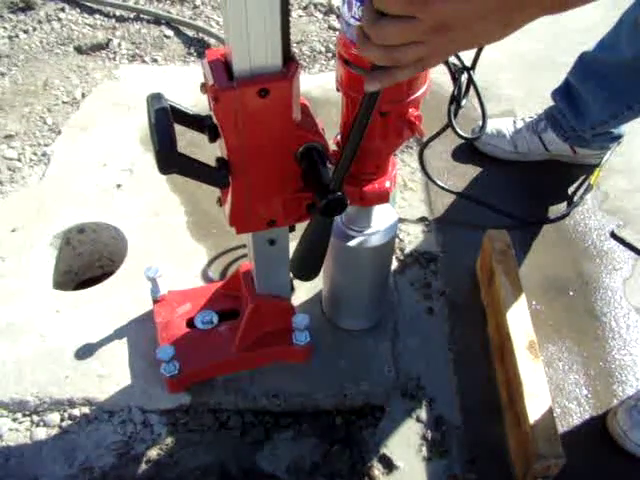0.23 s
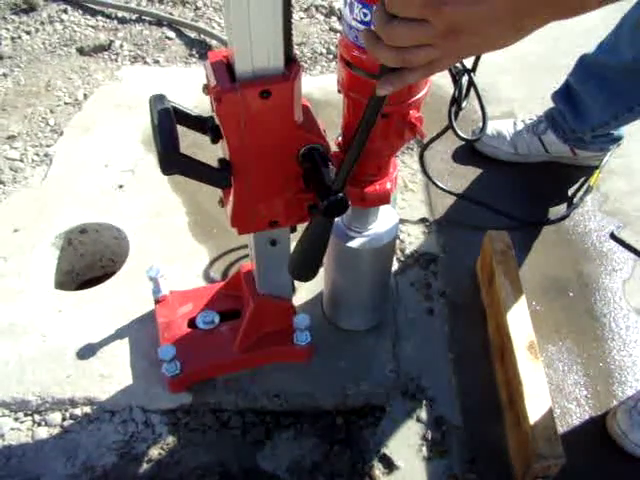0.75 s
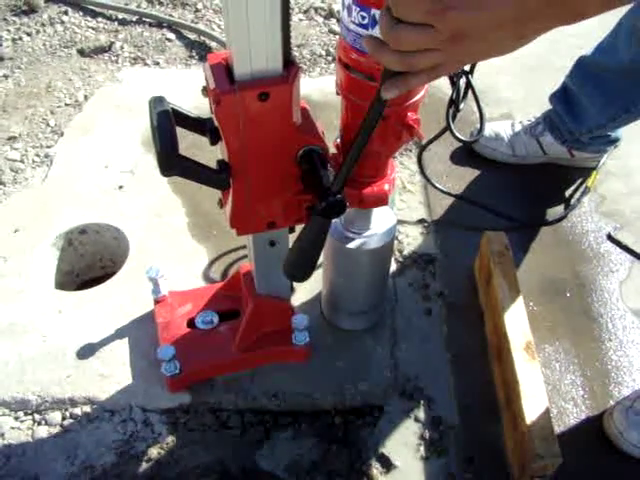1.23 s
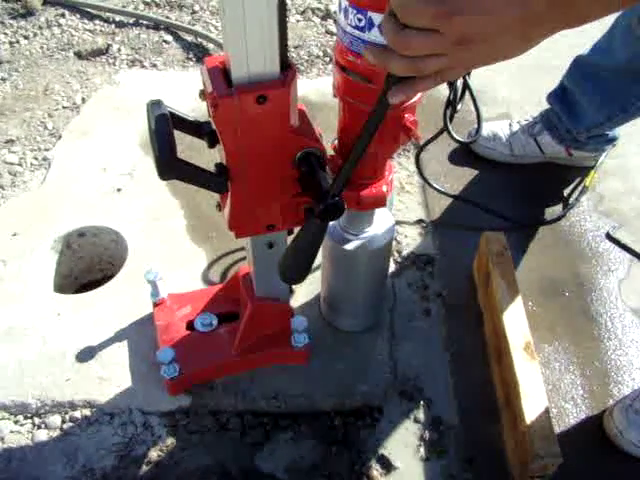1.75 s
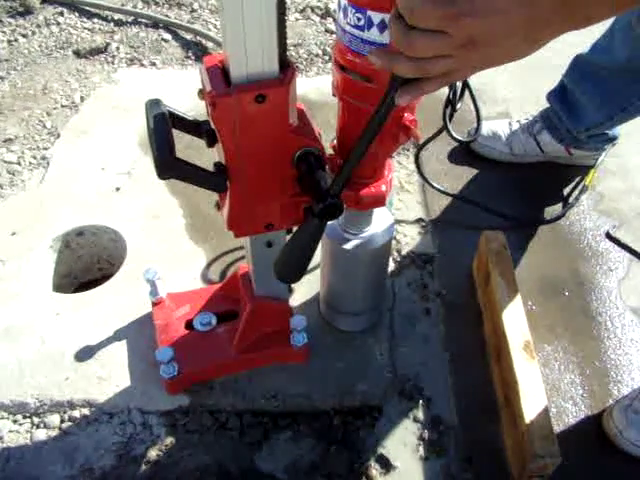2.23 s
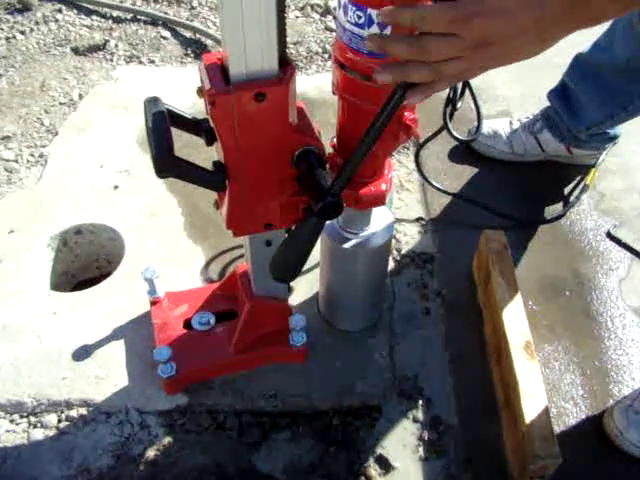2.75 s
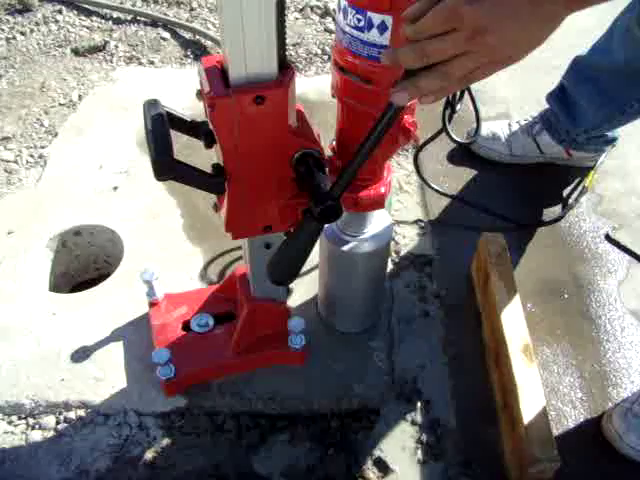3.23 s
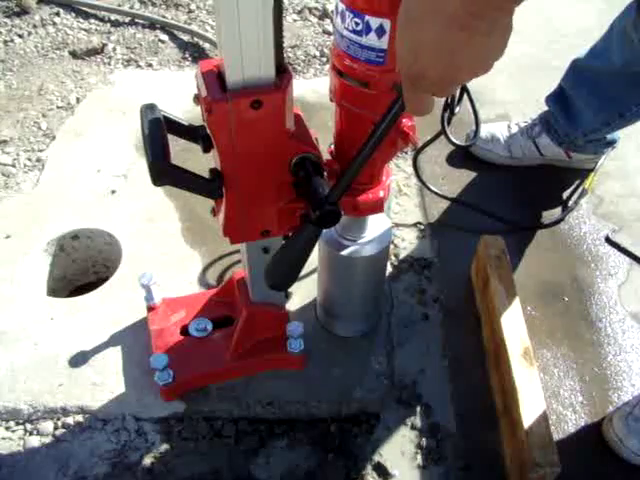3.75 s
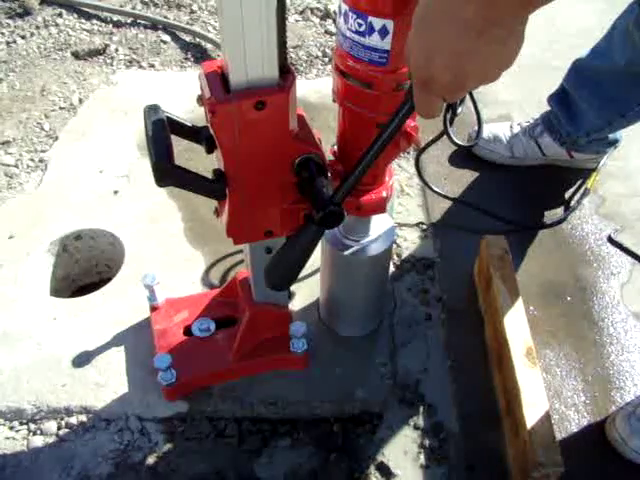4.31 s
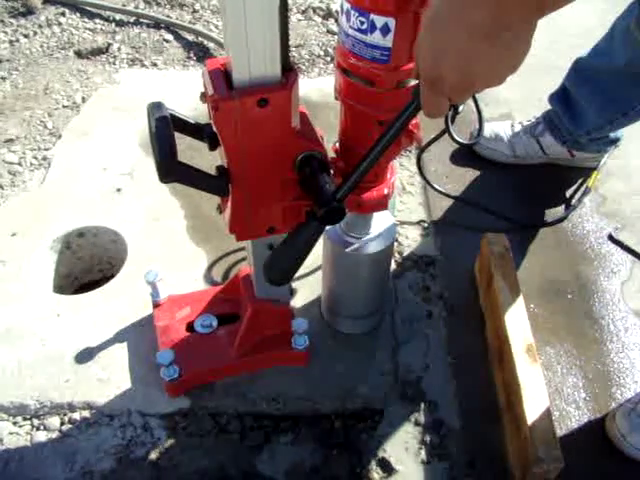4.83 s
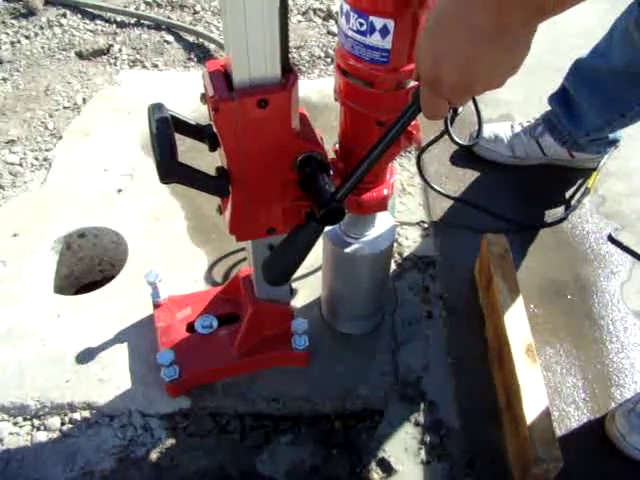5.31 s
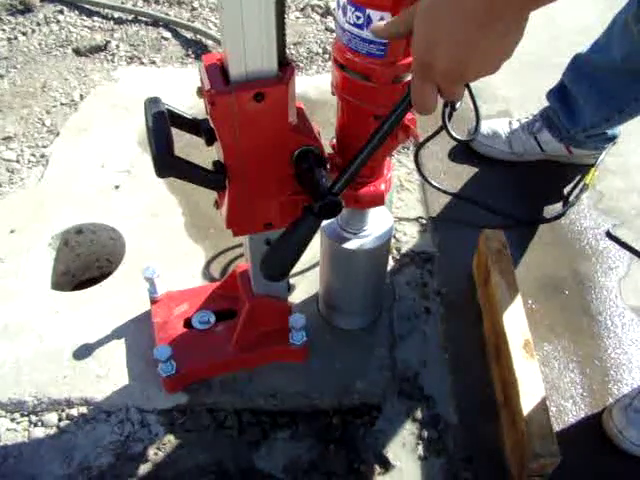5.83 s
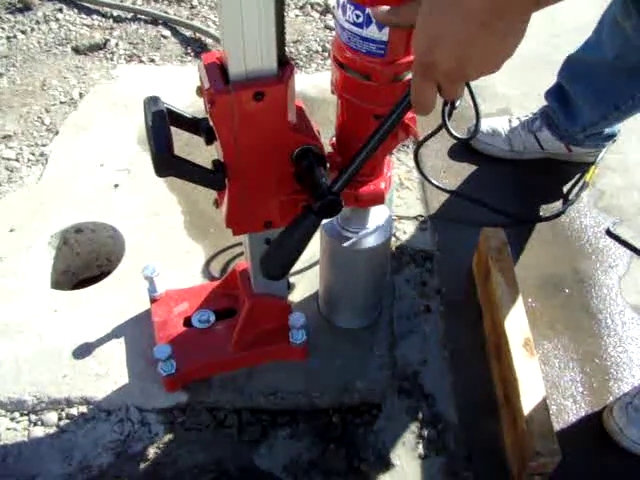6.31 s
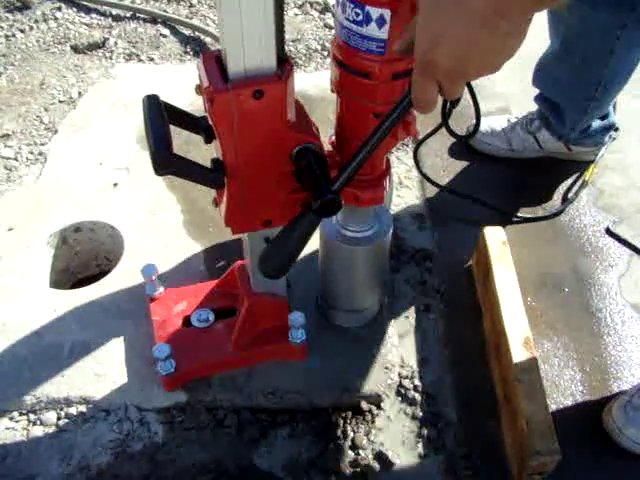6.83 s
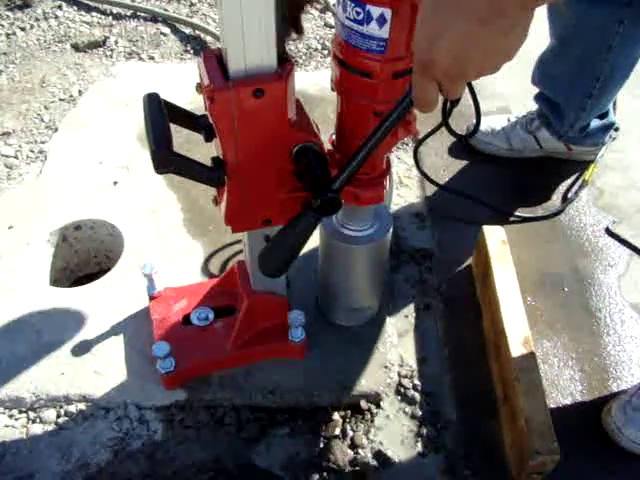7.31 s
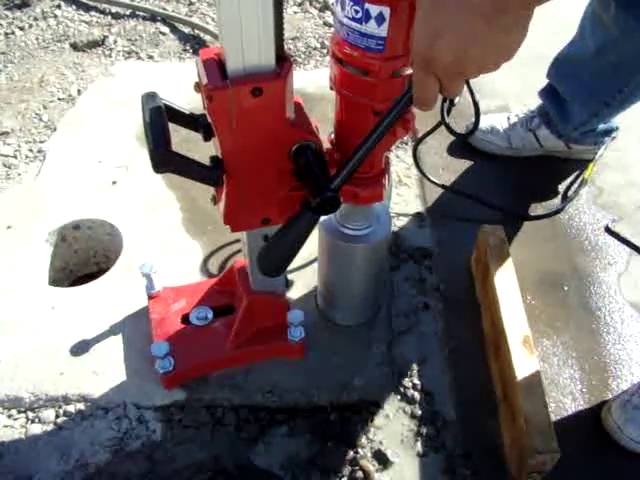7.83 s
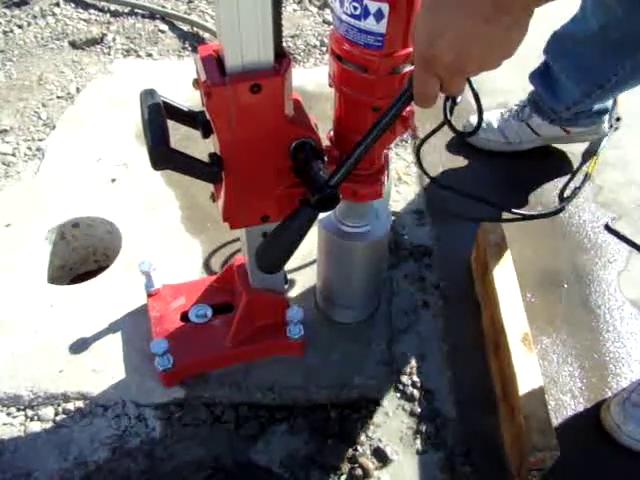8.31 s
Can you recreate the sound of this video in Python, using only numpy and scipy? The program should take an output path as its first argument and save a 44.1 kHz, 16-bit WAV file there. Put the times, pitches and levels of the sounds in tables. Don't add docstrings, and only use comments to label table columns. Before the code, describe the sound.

A geared drill motor runs continuously, first pressed hard with a firm buzzing whine and rough grinding roar. The whine wavers briefly, leaps higher as pressure is relieved, dips a little and climbs again. Then the smooth tone breaks into fast, irregular metallic knocking, with piercing steel chirps over rushing fan noise. Close, dry outdoor pickup on a small camera, mildly overdriven, weak in bass and cut off at the top.

```python
import sys
import numpy as np
from scipy import signal
from scipy.fft import rfft, irfft
from scipy.io import wavfile
from scipy.ndimage import uniform_filter1d

SR = 44100
rng = np.random.default_rng(int(sys.argv[2]) if len(sys.argv) > 2 else 0)


def put_to_file(sound):
    columns = np.atleast_2d(sound).T
    safe = np.clip(columns, -1, 1)
    whole_steps = np.round(safe * 32767)
    wavfile.write(sys.argv[1], SR, whole_steps.astype(np.int16))


def volts_from_db(level):
    exponent = np.asarray(level, float) / 20
    return 10 ** exponent


N = 377496
TIME = np.arange(N) / SR
SLACK_SPAN = (5.4, 6.65)


def walk(rate):
    hold = int(SR / rate)
    held = np.repeat(rng.standard_normal(N // hold + 1), hold)
    return 1.33 * uniform_filter1d(uniform_filter1d(held, hold), hold)[:N]


def spinner(turns):
    return np.exp(2j * np.pi * (turns + rng.random()))


def swells(s, db, width_s, sharp=2.2):
    out = np.zeros(N)
    for centre, gain, width in zip(s, volts_from_db(db), width_s):
        first = max(int((centre - 1.5 * width) * SR), 0)
        near = slice(first, int((centre + 1.5 * width) * SR))
        out[near] += gain * 2 ** -(abs(2 * (TIME[near] - centre) / width) ** sharp)
    return out


def motor_speed():
    # time in seconds, first mesh pitch in Hz.
    speed_curve = [(0, 2011), (1.5, 2023), (2.12, 2018), (2.38, 2029), (2.75, 2065), (3.13, 2023),
                   (3.87, 2346), (4.15, 2217), (4.5, 2238), (5.05, 2204), (5.3, 2235), (5.85, 2403),
                   (6.2, 2467), (6.65, 2511), (7.3, 2535), (8.14, 2557), (8.38, 2492), (8.56, 2496)]
    s, pitch = np.transpose(speed_curve)
    return uniform_filter1d(np.interp(TIME, s, pitch), SR // 7)


def by_load(mesh_hz, dbs):
    load_hz = (2030, 2240, 2500)
    return volts_from_db(np.interp(mesh_hz, load_hz, dbs))


def noise_spectrum(f):
    # frequency in Hz, level in dB per Hz.
    noise_colour = [(25, -34), (100, -33), (170, -31.5), (240, -23), (320, -25), (450, -17.5), (700, -10),
                    (1600, -6.5), (2300, -2.5), (3600, 0), (5500, -4), (7500, -5.5), (10000, -15)]
    # centre in Hz, width in Hz, boost in dB.
    housing_peaks = [(584, 190, 6.6), (992, 328, 10.7), (1367, 138, 8.1), (1948, 285, 9.6), (2590, 234, 7),
                     (3000, 390, 3.35), (3410, 190, 1.4), (4180, 480, 3.3), (4780, 320, 1.2),
                     (5440, 360, 2.5), (6940, 300, 2.5), (7860, 300, 3.4), (8840, 380, 3.1),
                     (9860, 1200, 6.24)]
    colour_hz, colour_db = np.transpose(noise_colour)
    db = np.interp(np.log(f), np.log(colour_hz), colour_db)
    for peak, width, boost in housing_peaks:
        db = db + boost / (1 + (2 * (f - peak) / width) ** 2)
    return rfft(rng.standard_normal(N)) * volts_from_db(db)


def hiss(hz, layshaft, knocks):
    # mesh pitch in Hz, then level in dB at each.
    blow_hz = (2040, 2110, 2200, 2290, 2500, 2545)
    blow_db = (0, -4, 0.4, 2, 1.74, 1.7)
    blow_share = (0.53, 0.79, .6)
    f = np.maximum(np.fft.rfftfreq(N, 1 / SR), 1)
    spectrum = noise_spectrum(f)
    levels = np.outer(blow_share, np.interp(hz, blow_hz, blow_db))
    levels = levels - levels.mean(axis=1, keepdims=True)

    angle = 2 * np.pi * layshaft
    throb = 0.062 * np.cos(angle) + 0.036 * np.cos(2 * angle)
    throb = throb + 0.06 * np.cos(angle * 8 / 38)
    throb = throb + 0.1 * np.cos(8 * angle)
    throb = throb + knocks - uniform_filter1d(knocks, SR // 4)

    out, shared_flicker = 0, walk(35)
    for third in range(27):
        centre = 25 * 2 ** (third / 3)
        window = np.clip(1 - abs(3 * np.log2(f / centre)), 0, 1)
        place = np.clip(np.interp(np.log(centre), np.log([1250, 3400, 8400]), [0, 1, 2]), 0, 2)
        low = min(int(place), 1)
        level_db = levels[low] + (place - low) * (levels[low + 1] - levels[low])
        if centre < 220:
            level_db = level_db - np.interp(TIME, SLACK_SPAN, (0, 5.0))
        if third == 19:
            level_db = level_db - np.interp(TIME, SLACK_SPAN, (0, 1.5))
        high = min(centre / 2200, 1)
        flicker_db = 0.4 * walk(8) + 0.3 * high * shared_flicker
        band = irfft(spectrum * window, N)
        out = out + band * volts_from_db(level_db + flicker_db) * (1 + high * throb)
    return out / np.std(out) * volts_from_db(-16.5)


def orders(hz, turns, table):
    out = 0
    for multiple, *dbs in table:
        breath = volts_from_db(1.5 + 1.2 * walk(4))
        line = spinner(multiple * turns + 0.03 * walk(12)).imag
        out = out + by_load(hz, dbs) * breath * line
    return np.sqrt(2) * out


def shafts(hz, layshaft):
    # multiple of the shaft speed, level in dB pressed hard,
    # in dB eased, in dB light.
    layshaft_orders = [(8, -52, -49, -63), (16, -45, -52, -57), (26, -49, -44, -41), (32, -47, -45, -43),
                       (36, -43, -38, -41), (38, -58, -41, -52), (40, -40, -37, -49), (42, -47, -39, -37),
                       (47, -50, -44, -48), (52, -54, -42, -49), (56, -45, -44, -54), (60, -51, -41, -50),
                       (72, -42, -42, -48), (76, -44, -44, -50), (80, -47, -39, -49), (94, -51, -47, -54),
                       (110, -50, -51, -62), (135, -49, -47, -70), (136, -53, -49, -74),
                       (51, -41, -50, -50), (69, -39, -49, -58), (96, -42, -55, -60), (104, -57, -41, -62),
                   (110, -45, -56, -62)]
    armature_orders = [(1, -78, -63, -57), (2, -46, -42, -42), (4, -49, -51, -53), (5, -59, -46, -46),
                       (6, -50, -40, -56), (8, -46, -34, -42), (12, -35, -45, -54), (15, -42, -46, -51),
                       (22, -57, -49, -50), (24, -49, -43, -44), (29, -58, -51, -93)]
    spindle_orders = [(12, -69, -75, -65), (13, -66, -84, -68), (14, -71, -66, -68), (16, -66, -65, -68),
                      (17, -64, -67, -80), (18, -72, -59, -79), (19, -57, -61, -79), (20, -63, -61, -78),
                      (21, -65, -78, -77), (28, -77, -63, -72), (29, -76, -64, -71), (30, -56, -63, -69)]
    out = orders(hz, layshaft, layshaft_orders)
    out = out + orders(hz, layshaft * 34 / 7, armature_orders)
    return out + orders(hz, layshaft * 8 / 38, spindle_orders)


def barrel(hz, layshaft):
    # centre in seconds, level in dB, length in ms.
    song_fits = [(5.87, -36, 57), (6.05, -34, 45), (6.124, -27, 59), (6.255, -29, 56), (6.346, -27.5, 72),
                 (6.492, -30, 80), (6.59, -30, 33), (6.662, -23, 58), (6.765, -22, 32), (6.895, -26.5, 36),
                 (6.971, -28, 77), (7.055, -28, 40), (7.15, -27, 35), (7.223, -23, 46), (7.355, -25, 42),
                 (7.44, -24.5, 27), (7.5, -27, 57), (7.569, -20, 18), (7.639, -27.5, 40), (7.69, -25, 39),
                 (7.745, -21, 52), (7.805, -18.5, 17), (7.879, -20, 76), (7.981, -29, 47),
                 (8.104, -22.5, 51), (8.177, -19.5, 38), (8.274, -21.5, 31), (8.397, -29, 46),
                 (8.472, -33, 25), (8.515, -25, 16)]
    hum_db = (-40.5, -45.5, -39)
    s, db, ms = np.transpose(song_fits)
    fits = swells(s, db - 1.5, ms / 1000, sharp=4.5) * (1 + 0.23 * walk(80))
    hum = by_load(hz, hum_db) * volts_from_db(3.0 * walk(20))
    ring_on = 0.3 * uniform_filter1d(fits, SR // 6)
    tone = spinner(11.07 * layshaft + 0.22 * walk(25) + 0.28 * walk(4)).imag
    return np.sqrt(2) * (hum + fits + ring_on) * tone


def rattle():
    # time in seconds, peak in dB.
    hard_knocks = [(5.605, -13.5), (5.765, -12), (5.872, -14), (5.989, -11), (6.03, -12.5), (6.17, -13),
                   (6.271, -10.5), (6.364, -10), (6.432, -8), (6.473, -8), (6.627, -9.5), (6.659, -11),
                   (6.73, -8.5), (6.775, -8.5), (6.799, -7), (6.824, -8.5), (6.882, -9), (7.136, -10),
                   (7.179, -9), (7.389, -9.5), (7.46, -10.5), (7.497, -13.5), (7.898, -7.5), (8.032, -8.5),
                   (8.111, -7.5), (8.138, -7.5), (8.204, -10), (8.244, -13), (8.338, -8), (8.407, -9.5),
                   (8.516, -7)]
    # time in seconds, level of the light knocks in dB.
    looseness = [
        (5.5, -17.5),
        (6.25, -15.5),
        (6.55, -12),
        (7.1, -12.5),
        (7.5, -14),
        (7.68, -16.5),
        (7.85, -12.5),
        (8.5, -14),
    ]
    gap_s, jitter_s, scatter_db = 0.0185, 0.0022, 2.5
    s, db = np.transpose(hard_knocks)
    ends = np.r_[s[0] - 3 * gap_s, s, TIME[-1]]
    light = []
    for a, b in zip(ends, ends[1:]):
        steps = max(round((b - a) / gap_s), 1)
        light.extend(np.linspace(a, b, steps + 1)[1:-1])
    light = np.array(light)
    scatter, jitter = rng.standard_normal((2, len(light)))
    light_db = np.interp(light, *np.transpose(looseness)) + scatter_db * np.clip(scatter, -3, 1.3)
    s = np.r_[s, light + jitter_s * jitter]
    db = np.r_[db, light_db]
    return swells(s, db - 0.5, np.full(len(s), 0.0055))


def shaft_wobble(hz, layshaft):
    # layshaft turns, spindle turns, sign (like signs throb, unlike give vibrato),
    # level in dB pressed hard, in dB eased, in dB light.
    eccentric = [
        (0, -1, 1, -11, -15, -22),
        (0, 1, -1, -17, -15, -22),
        (-1, 0, 1, -18, -12, -20),
        (1, 0, 1, -20, -16, -15),
        (2, 0, 1, -29, -14, -19),
    ]
    out = 0
    for lay, spin, sign, *dbs in eccentric:
        gain = by_load(hz, dbs) * sign * volts_from_db(1.5 * walk(14))
        turns = 0.05 * walk(14) + (lay + spin * 8 / 38) * layshaft
        out = out + gain * np.exp(2j * np.pi * turns)
    return out


def mesh(hz, layshaft, knocks):
    # pitches in Hz, then levels in dB there.
    case_hz = [(2026, 2062, 2160, 2246, 2278, 2312, 2465, 2495),
               (4040, 4120, 4310, 4465, 4640, 4940, 4990, 5030),
               (6060, 6160, 6480, 6640, 6830, 6950, 7300, 7620)]
    case_db = [(-15, -23.5, -19, -25, -36, -29, -35, -24.5),
               (-36, -32, -21.5, -32.5, -26.5, -24, -29.5, -36.5),
               (-36.5, -45, -25.5, -26, -32.5, -29.5, -46, -46)]
    # start, full, hold end, settled, in seconds.
    stutter_s = (5.45, 5.6, 5.95, 6.15)
    slack = np.interp(TIME, SLACK_SPAN, (0, 1))
    out = 0
    for k in range(3):
        db = np.interp((k + 1) * hz, case_hz[k], case_db[k])
        steady = volts_from_db(db + 0.53 * walk(9)) * (1 + 0.11 * walk(70) + 0.1j * walk(70))
        wobble = uniform_filter1d(volts_from_db(db), 2 * SR) * shaft_wobble(hz, layshaft)
        tooth = steady + wobble * (1 + 0.35 * k)
        if k == 0:
            beat = np.interp(TIME, (2.3, 2.75, 3.2), (0, 0.22, 0)) * (1 + 0.7 * walk(12))
            tooth = tooth * (1 + beat * np.cos(2 * np.pi * layshaft))
            tooth = tooth * (1 - 0.7 * slack) + knocks / np.sqrt(2) * np.exp(0.25j * walk(70))
        else:
            stutter = np.interp(TIME, stutter_s, (0, 1, 1, 0.25))
            tooth = tooth * (1 + stutter * (7.9 * knocks - 0.5))
        out = out + tooth * spinner(34 * (k + 1) * layshaft + 0.055 * walk(30))
    return np.sqrt(2) * out.imag


def scene():
    hz = motor_speed()
    layshaft = np.cumsum(hz) / SR / 34
    knocks = rattle()
    drill = hiss(hz, layshaft, knocks) + shafts(hz, layshaft) + barrel(hz, layshaft)
    drill = drill + mesh(hz, layshaft, knocks)
    return drill[None, :]


def starve(x):
    f, s, cells = signal.stft(x, SR, nperseg=320)
    power = uniform_filter1d(abs(cells) ** 2, size=4, axis=0)
    usual = uniform_filter1d(power, size=60, axis=1)
    limit_db = np.interp(s, (0, 4.5, 6, 8.5), (-5.2, -5.6, -4.7, -4.0))
    limit_db = limit_db + 0.5 * rng.standard_normal(len(s))
    whim = rng.standard_normal((len(f), len(s) // 6 + 1))
    whim_db = 2.5 * np.repeat(whim, 6, axis=1)[:, :len(s)]
    dropped = (power < usual * volts_from_db(2 * limit_db + whim_db)) & (f[:, None] > 4900)
    dropped |= (f[:, None] > 7500) & (abs(s - 8.123) < 0.004)
    dropped = uniform_filter1d(1.0 * dropped, size=3, axis=0) > 0
    return signal.istft(np.where(dropped, volts_from_db(-18) * cells, cells), SR, nperseg=320)[1][:N]


def roll_off(x):
    return signal.sosfilt(signal.butter(12, 10780, fs=SR, output="sos"), x)


def record(dry):
    rounded = np.tanh(0.79 * dry[0]) / 0.8
    thin = signal.sosfilt(signal.butter(1, 110, "high", fs=SR, output="sos"), rounded)
    top_db = np.interp(np.fft.rfftfreq(N, 1 / SR), (9980, 10060, 10140, 10240), (0, -8, -28, -80))
    mix = irfft(rfft(starve(thin)) * volts_from_db(top_db), N)
    return roll_off(mix[None, :])


dry = scene()
out = record(dry)
put_to_file(out)
```